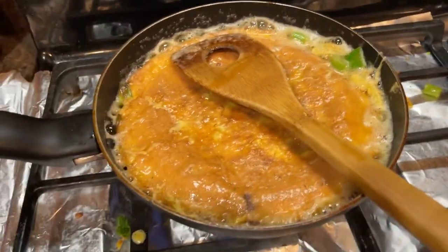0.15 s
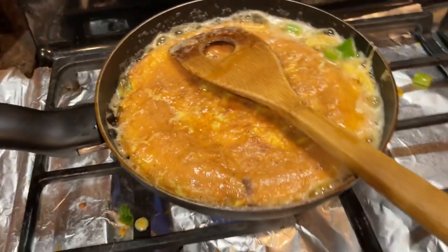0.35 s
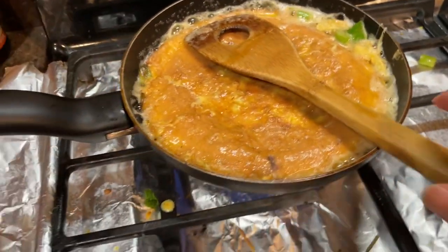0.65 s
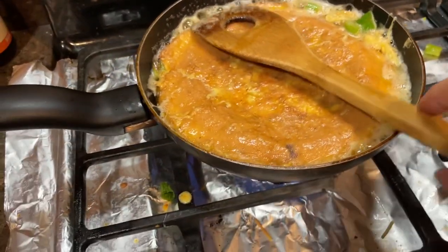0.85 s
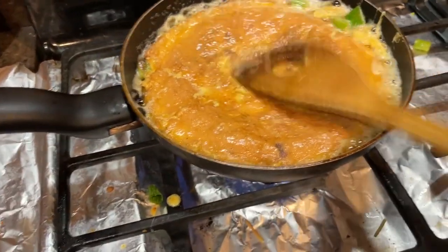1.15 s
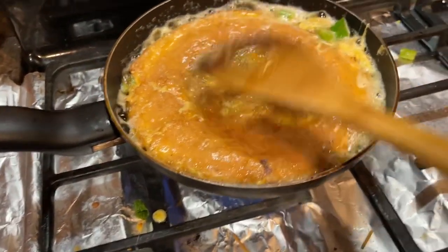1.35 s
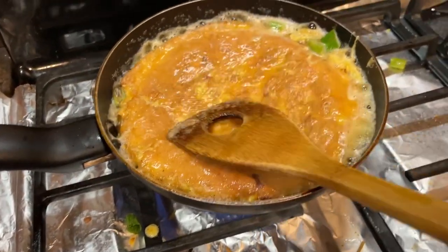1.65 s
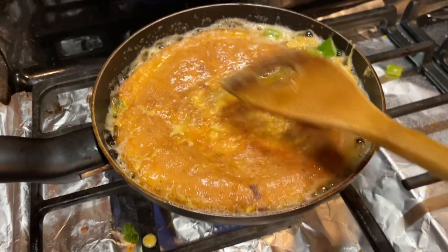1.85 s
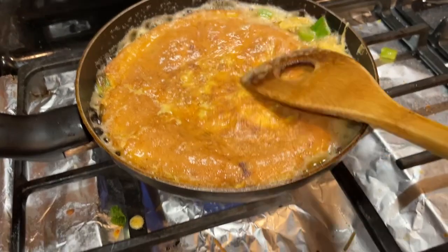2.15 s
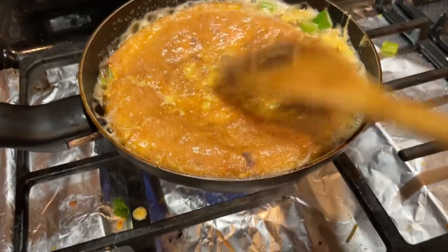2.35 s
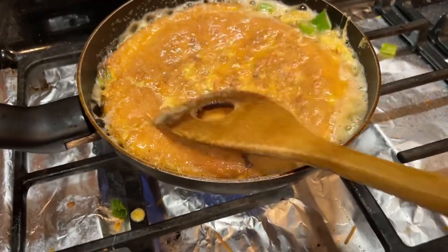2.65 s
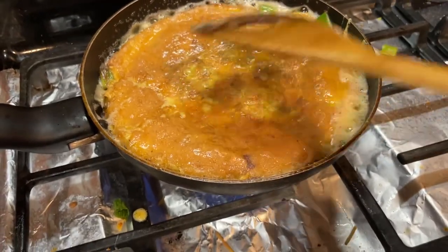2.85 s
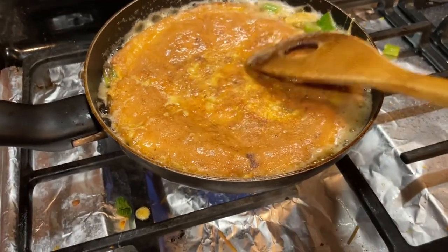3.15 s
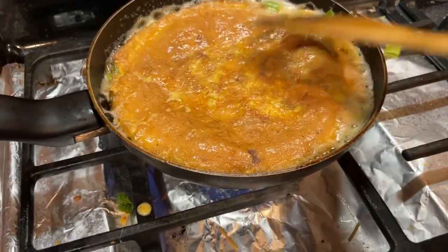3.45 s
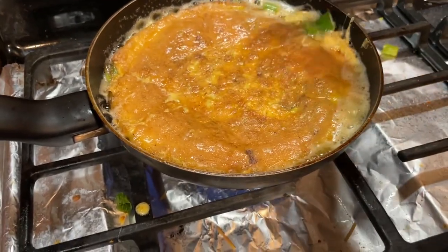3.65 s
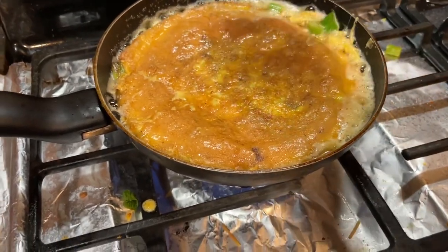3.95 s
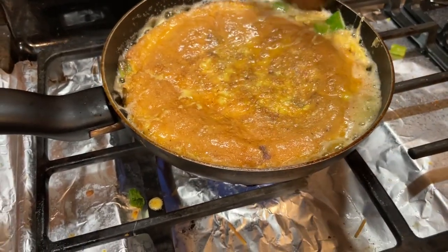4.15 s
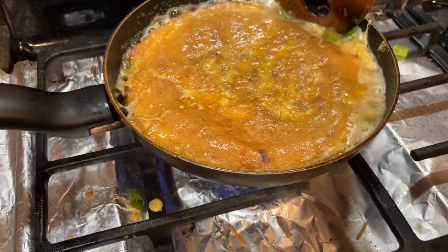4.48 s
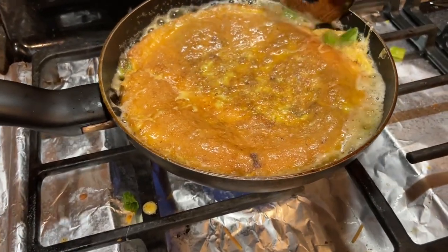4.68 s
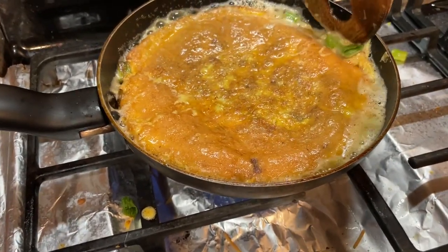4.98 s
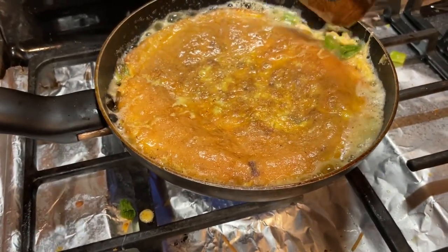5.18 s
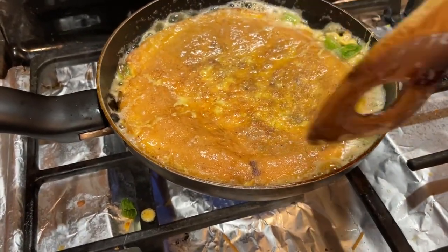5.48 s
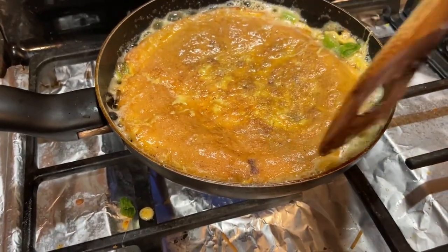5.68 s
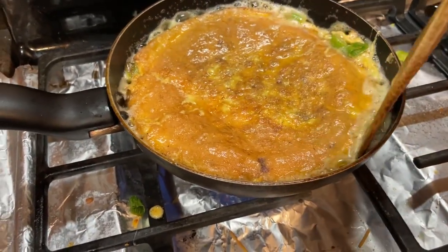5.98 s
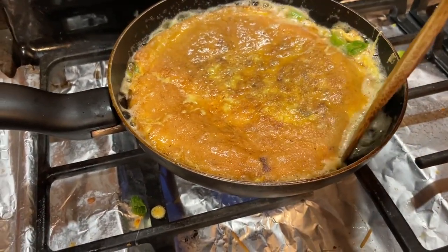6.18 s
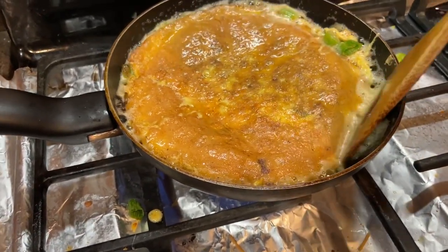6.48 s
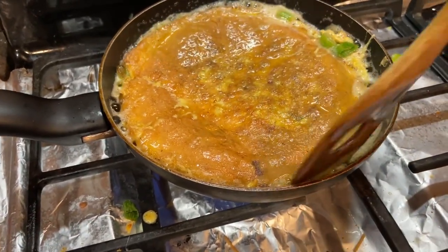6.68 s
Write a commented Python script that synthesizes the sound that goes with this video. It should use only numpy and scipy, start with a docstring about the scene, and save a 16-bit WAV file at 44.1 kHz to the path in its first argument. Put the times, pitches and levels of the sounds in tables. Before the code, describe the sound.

Close to a pan on a gas stove, egg batter fries with a dense, bright fizz and irregular popping spits. A wooden spoon cracks sharply on the pan early, with faint taps after. Later a heavier knock rocks the pan on its iron grate. Near the end the spoon scrapes the wall and knocks twice as the sizzle swells. Low kitchen hum and rumble lie beneath.

```python
"""An egg pancake fries in oil on a gas stove, close to a phone: throughout, crackling noise makes dense fizz
and short rings with snaps make spits of steam; a motor (wavering sine) hums over rumble (shaped noise).
At 1.15 s a wooden spoon knocks the pan (damped modes, chattering noise); light knocks follow. At 4.55 s
another rocks the pan on its iron grate (low sine pulses). From 6.0 s the spoon scrapes the wall (clicks
and grit through resonances); two knocks come at 6.49 and 6.72 s as the fizz swells to the end."""
import sys
import numpy as np
from scipy import signal
from scipy.fft import rfft, irfft, next_fast_len
from scipy.io import wavfile
from scipy.ndimage import uniform_filter1d

SR = 44100
rng = np.random.default_rng(int(sys.argv[2]) if len(sys.argv) > 2 else 0)


def store_wav(level_fs):
    """Save 16-bit WAV to argv[1]."""
    pcm = np.round(np.clip(np.atleast_2d(level_fs), -1, 1) * 32767)
    wavfile.write(sys.argv[1], SR, pcm.T.astype(np.int16))


N = 301057


def undb(db):
    """Decibels to gain."""
    return 10 ** (np.asarray(db) / 20)


def level(x, db):
    """Scale to an rms level."""
    return x * undb(db) / np.sqrt(np.mean(x ** 2))


def curve(rows, rest_db=-90):
    """A level table as gain per sample, rest_db outside it."""
    s, db = np.transpose(rows)
    return undb(np.interp(np.arange(N) / SR, s, db, rest_db, rest_db))


def colour(x, points, lag_s=0.):
    """Shape by (frequency [Hz], gain [dB]) points and delay by lag_s."""
    size = next_fast_len(N + 4096)
    hz = np.maximum(np.arange(size // 2 + 1) * SR / size, 1)
    f, db = np.transpose(points)
    gain = undb(np.interp(np.log(hz), np.log(f), db))
    delay = np.exp(-2j * np.pi * hz * lag_s)
    return irfft(rfft(x, size) * gain * delay, size)[..., :N]


def band(x, hz, width_hz):
    """Resonance with gain 1 at its centre."""
    b, a = signal.iirpeak(hz, hz / width_hz, fs=SR)
    return signal.lfilter(b, a, x)


def walk(rate_hz):
    """Random levels held 1 / rate_hz s and smoothed twice; spread near 1."""
    k = int(SR / rate_hz)
    steps = np.repeat(rng.standard_normal(N // k + 1), k)
    return 1.3 * uniform_filter1d(uniform_filter1d(steps, k), k)[:N]


def add(out, s, piece):
    """Mix a short sound in at time s."""
    i = int(round(s * SR))
    out[i:i + len(piece)] += piece[:N - i]


def crackle(per_s, spread_db, tail_s):
    """Random bursts, a few much larger than most, each with a short rustling tail; rms 1."""
    hits = rng.random(N) < per_s / SR
    sizes = hits * undb(spread_db * np.minimum(rng.exponential(size=N), 5))
    keep = np.exp(-1 / (tail_s * SR))
    power = signal.lfilter([1], [1, -keep], sizes ** 2)
    return level(np.sqrt(power) * rng.standard_normal(N), 0)


PORT_LAG_S = 4.4e-5


def ports(x):
    """A source near the phone reaches the left port first, the right PORT_LAG_S later."""
    flat = [(1, 0), (2, 0)]
    return np.array([x, colour(x, flat, PORT_LAG_S)])


# side channel under mid: (frequency [Hz], gain [dB])
SIDE_GAIN = [(60, -42), (200, -25), (380, -10.5), (700, -3.5), (1300, -3.5)]


def widen(mid, side):
    """Left and right from mid plus and minus the shaped side."""
    return mid + colour(side, SIDE_GAIN) * np.array([[1], [-1]])


# oil activity: (time [s], level [dB])
FIZZ_LEVEL = [(0.0, -51), (0.18, -52), (0.83, -54), (2.0, -51.5), (2.81, -52.5), (2.96, -50.5),
              (3.35, -50.5), (3.66, -53.5), (4.15, -52), (4.4, -52), (4.78, -52), (5.3, -51), (5.91, -53.5),
              (6.83, -47.5)]
# fizz spectrum: (frequency [Hz], gain [dB])
FIZZ_COLOUR = [(500, -8), (1000, -1), (2000, -2), (3000, -4), (4000, -1), (6000, 0), (8500, 0), (10500, -2),
               (11300, -6), (13000, -11), (14500, -9), (15300, -4), (15720, -5), (15850, -24)]


def fizz():
    """Countless tiny bubbles, sparser large ones, and the part scattered by the hob."""
    tiny = crackle(2500, 2.64, 0.00081) * undb(2.0 * walk(8.1) + 1.22 * walk(30))
    large = undb(-10.0) * crackle(140, 7.3, 0.003)
    scattered = np.array([crackle(3300, 2.6, 0.0016) for _ in range(2)]) * undb(1.0 * walk(15))
    # short waves come straight, long ones from all round
    tilt = [(1000, 3.5), (5000, 1.0), (9000, -10), (16000, -100)]
    bubbles = ports(tiny + large) + undb(1.5) * colour(scattered, tilt)
    return curve(FIZZ_LEVEL) * level(colour(bubbles, FIZZ_COLOUR), 0)


# spits at set times, most of them loud; levels before colouring:
# (time [s], bubble level [dB], bubble pitch [Hz], treble snap level [dB])
SET_SPITS = [(0.014, -44, 4500, -35), (0.126, -42, 5500, -39), (0.183, -47, 4500, -40),
             (0.408, -40, 4000, -48), (0.614, -46, 4500, -47), (0.1946, -39.5, 5130, -47),
             (0.284, -45, 6760, -30.5), (0.545, -38, 5530, -26.5), (0.7173, -58, 1600, -30),
             (1.0475, -42, 4800, -28), (1.3742, -42, 4790, -29), (1.4287, -54, 6460, -29.5),
             (1.5591, -53, 3260, -30), (1.69, -38, 1840, -56), (2.126, -36, 1730, -32),
             (2.1407, -27.5, 4830, -27), (2.2261, -42.5, 4740, -29), (2.7529, -56, 6500, -28),
             (2.8168, -52, 1290, -27), (2.885, -40.5, 5000, -35), (2.9451, -42, 6800, -28.5),
             (3.0066, -34, 6640, -25), (3.1002, -58, 5360, -29), (3.2142, -33.5, 4800, -33),
             (3.2429, -34, 5370, -23), (3.39, -47, 5500, -30), (3.6, -42, 3500, -50),
             (3.7175, -39.5, 6980, -26), (3.903, -55, 4650, -27), (4.2237, -50, 6050, -30.5),
             (4.231, -49, 5800, -45), (4.335, -42, 5000, -36), (4.3399, -45, 4760, -27),
             (4.354, -43, 3500, -53), (4.399, -40, 5500, -33), (4.422, -39, 4500, -45),
             (4.4268, -39, 4480, -43), (4.498, -49, 5000, -29), (4.623, -29.5, 6700, -47),
             (4.6822, -40, 5470, -27), (4.898, -42, 4500, -44), (4.916, -38.5, 5000, -48),
             (5.077, -41, 4520, -34), (5.135, -49, 5500, -34), (5.176, -48, 5000, -36),
             (5.44, -51, 4500, -38), (5.488, -58, 6000, -33), (5.2055, -45, 5680, -30),
             (5.5886, -61, 5640, -26), (6.0164, -41, 4900, -22), (6.2209, -36, 4640, -31),
             (6.2879, -36, 6230, -20.5), (6.5763, -30.5, 5020, -40), (6.5967, -27.5, 7000, -17.5),
             (6.618, -37.5, 4000, -44)]
# air in the pan's bowl: (frequency [Hz], width [Hz], gain [dB])
BOWL_AIR = [(2290, 590, -8), (3800, 560, -4), (4650, 160, -16), (5750, 630, 0)]


def spits():
    """Each spit: a bubble that rings a few cycles, a bright snap, a spray of droplets."""
    bubbles, snaps, t = np.zeros(N), np.zeros(N), np.arange(1500) / SR
    rows = [*SET_SPITS, *small_spits()]
    chance = rng.standard_normal((len(rows), 2, len(t)))
    burst = np.exp(-t / 0.0004) + 0.26 * np.exp(-t / 0.006)
    for (s, db, hz, snap_db), (splash, spray) in zip(rows, chance):
        ring = np.exp(-t * hz / 1.7) * np.sin(2 * np.pi * hz * t)
        add(bubbles, s, undb(db) * (ring + 1.21 * splash * burst))
        add(snaps, s, undb(snap_db) * spray * burst)
    low = colour(bubbles, [(700, -62), (1500, -0.5), (6500, 3.5), (9000, -20)])
    low = low + sum(undb(db) * band(low, hz, width_hz) for hz, width_hz, db in BOWL_AIR)
    snap_colour = [(4000, -25), (7000, 3.5), (10500, -4.5), (13000, -8.0), (15700, -3.0), (16300, -28)]
    return ports(low + colour(snaps, snap_colour))


SMALL_SPITS_PER_S = 45
SMALL_BUBBLE_TOP_DB, SMALL_BUBBLE_SPREAD_DB = -46, 4
SMALL_PITCH_HZ, SMALL_PITCH_SPREAD_OCT = 4900, 0.28
SMALL_SNAP_TOP_DB, SMALL_SNAP_SPREAD_DB = -41.5, 17.5


def small_spits():
    """Rows like those of the set spits, drawn by chance: bubbles and snaps fall below their top levels."""
    count = int(SMALL_SPITS_PER_S * N / SR)
    bubble, pitch, snap = rng.standard_normal((count, 3)).T
    times_s = rng.random(count) * N / SR
    bubble_db = SMALL_BUBBLE_TOP_DB - SMALL_BUBBLE_SPREAD_DB * abs(bubble)
    pitch_hz = SMALL_PITCH_HZ * 2 ** (SMALL_PITCH_SPREAD_OCT * pitch)
    snap_db = SMALL_SNAP_TOP_DB - SMALL_SNAP_SPREAD_DB * abs(snap)
    return list(zip(times_s, bubble_db, pitch_hz, snap_db))


# modes of pan and grate: (frequency [Hz], relative level [dB], free t60 [s])
PAN_MODES = [(77, 9, 0.2), (118.7, -7, 0.44), (160.5, 5.5, 0.16), (227, -9.5, 0.17), (269.3, -1.5, 0.22),
             (329.4, -6.5, 0.3), (368, -3, 0.21), (425.5, -14, 0.43), (489, -4, 0.073), (583, -5, 0.039),
             (674, -7.5, 0.1), (777, -18.5, 0.33), (897, -12, 0.1), (1059, -12, 0.2), (1120, -8, 0.092),
             (1220, -17, 0.18), (1476, -7, 0.043), (1580, -16.5, 0.074), (1525, -13, 0.03),
             (1667, -10.5, 0.12), (2065, -5, 0.043), (2250, -11.5, 0.08), (2327, -9, 0.06),
             (2750, -24, 0.08), (2980, -26, 0.12), (3674, 2, 0.049), (5060, -16, .025), (5880, -0.5, 0.035),
             (6500, 1, 0.026)]
# ringing parts of the knocks, several to a knock: (time [s], level [dB],
# pitch of the modes driven most [Hz], spread [octaves], multiple of the free t60 [1])
KNOCK_PARTS = [(1.1542, -14, 3100, 1.45, 0.31), (1.158, -18.5, 710, 0.3, 1.7),
               (1.159, -24.5, 243, 0.37, 1.5), (1.174, -26, 650, 0.61, 1.7), (1.166, -26, 500, 0.15, 2.1),
               (1.17, -25, 1040, 0.1, 0.8), (1.185, -25, 95, 0.52, 0.74), (1.161, -43, 1200, 0.17, 1.5),
               (1.197, -33.5, 900, 0.33, 1.5), (1.218, -27, 560, 0.85, 0.44), (1.221, -35, 1100, 0.25, 0.8),
               (1.237, -35, 1060, 0.2, 0.7), (1.24, -36, 530, 0.27, 0.9), (1.392, -34.5, 396, 1.9, 0.27),
               (2.362, -27, 1400, 0.15, 0.27), (4.211, -32, 1550, 0.29, 0.27),
               (4.554, -28.5, 905, 1.2, 1.2), (4.552, -19, 195, 0.78, 1.6), (4.564, -14.5, 200, 0.55, 0.78),
               (4.5718, -15.5, 106, 1.1, 0.83), (4.56, -25, 2600, 0.23, 0.75),
               (4.592, -25.5, 2800, 0.15, 1), (4.59, -33, 400, 0.76, 0.82), (4.626, -24.5, 200, 0.54, 0.88),
               (4.642, -18.5, 156, 0.36, 0.7), (4.576, -29, 2000, 0.4, 0.8), (4.612, -31, 1800, 0.4, 0.8),
               (4.634, -36, 1900, 0.45, 0.8), (4.681, -29.5, 160, 0.75, 0.81),
               (5.572, -39.5, 440, 0.39, 1.8), (5.834, -42, 427, 0.24, 4.5), (6.487, -31, 706, 1, 0.72),
               (6.488, -20, 620, 0.15, 1.2), (6.496, -25.5, 1350, 0.72, 0.91),
               (6.4965, -18, 370, 0.24, 0.64), (6.524, -24.5, 160, 0.53, 0.83),
               (6.505, -27, 260, 0.18, 0.8), (6.541, -29, 350, 0.43, 0.53), (6.521, -32, 1400, 0.46, .9),
               (6.545, -35, 2000, 0.34, 1.2), (6.562, -38, 1600, .4, 1), (6.502, -24.5, 122, 0.53, 1.2),
               (6.723, -29, 900, 0.37, .55), (6.723, -19.5, 585, 0.1, 1.35), (6.735, -14, 2400, 0.14, .6),
               (6.733, -23, 2000, 0.3, 0.8), (6.739, -18, 340, 0.25, 0.47), (6.738, -24, 620, 0.14, 1.1),
               (6.792, -28, 530, 0.47, 0.92), (6.751, -12.5, 92, 0.55, 0.7), (6.806, -26.5, 91, 1.1, 0.55)]
CONTACT_S, CONTACT_HZ, CONTACT_LAW = 0.002, 400, 0.37  # push time at CONTACT_HZ; duller parts rise slower


def knocks():
    """Each part of a knock rings the modes near its pitch, each mode with its own decay."""
    ring, t = np.zeros(N), np.arange(SR // 2) / SR
    hz, mode_db, t60_s = np.transpose(PAN_MODES)[:, :, None]
    # neighbouring modes push the air in opposite senses
    signs = -(-1.) ** np.arange(len(PAN_MODES))[:, None]
    waves = signs * undb(mode_db) * np.sin(2 * np.pi * hz * t)
    for s, db, centre_hz, spread_oct, free in KNOCK_PARTS:
        share = np.exp(-.5 * (np.log2(hz / centre_hz) / spread_oct) ** 2)
        contact_s = CONTACT_S * (CONTACT_HZ / centre_hz) ** CONTACT_LAW
        push = 1 - np.exp(-t / contact_s)
        decay = undb(-60 * t / (free * t60_s))
        add(ring, s, undb(db) * (share * decay * waves).sum(axis=0) * push)
    return ports(ring)


# jolts: (time [s], rattle level [dB], hiss level [dB], crack level [dB], multiple of the free t60 [1])
PAN_JOLTS = [(1.153, -29, -34.5, -13, 0.51), (1.172, -41, -71, -42, 2), (1.215, -49, -65, -70, 0.38),
             (4.549, -38, -37, -64, 0.81), (4.557, -30, -38, -62, 0.77), (4.569, -41, -57, -65, 0.73),
             (4.593, -40, -52, -67, 0.39), (4.632, -59, -59, -65, 0.41), (4.66, -50.5, -58, -67, 2.2),
             (6.485, -28.5, -42, -60, 0.68), (6.5, -45, -48.5, -65, 3), (6.722, -25, -36, -62, 0.55),
             (6.737, -29.5, -47, -67, 0.41), (6.804, -42, -64, -67, 0.57)]
# grate chatter, before the pan modes: (frequency [Hz], gain [dB])
RATTLE_COLOUR = [(60, -14), (120, 0), (400, 10), (1200, -3.5), (2500, -16.5), (4000, -61)]
# bright part of the chatter: (frequency [Hz], gain [dB])
HISS_COLOUR = [(1000, -9.5), (2000, -5.5), (3300, -8), (4500, -12), (8000, -24.5), (10000, -73)]
# wood meeting steel: (frequency [Hz], gain [dB])
CRACK_COLOUR = [(800, 0), (1600, 9.5), (4000, 5.5), (7000, 3), (9500, -1), (11000, -63)]
CLATTER_T60_S, HISS_T60_S, CRACK_T60_S = 0.36, 0.42, 0.03  # free decay
JOLT_RISE_S, CRACK_RISE_S = 0.0013, 0.001


def chatter():
    """Each jolt sets the pan chattering on the grate as decaying noise; the knock at 1.15 s also cracks."""
    rattle, hiss, crack = np.zeros((3, N))
    t = np.arange(SR // 2) / SR
    build = 1 - np.exp(-t / JOLT_RISE_S)
    crack_build = 1 - np.exp(-t / CRACK_RISE_S)
    for s, rattle_db, hiss_db, crack_db, free in PAN_JOLTS:
        fall_db = -60 * t / free
        add(rattle, s, undb(rattle_db + fall_db / CLATTER_T60_S) * build)
        add(hiss, s, undb(hiss_db + fall_db / HISS_T60_S) * build)
        add(crack, s, undb(crack_db + fall_db / CRACK_T60_S) * crack_build)
    shake = 0
    layers = ((rattle, RATTLE_COLOUR, 900), (hiss, HISS_COLOUR, 500), (crack, CRACK_COLOUR, 20000))
    for envelope, points, per_s in layers:
        noise = colour([crackle(per_s, 1.8, 0.0057) for _ in range(2)], points)
        if envelope is rattle:  # sounds through the pan's own modes
            noise = 0.2 * noise + sum(band(noise, hz, 20.0 / t60_s) for hz, _, t60_s in PAN_MODES)
        mid, side = level(noise, 0)
        shake = shake + envelope * widen(mid, 0.9 * side)
    return shake


# pan's lowest mode, pumped: (time [s], peak level [dB], frequency [Hz], length [s])
PAN_ROCKS = [(4.689, -20, 76, 0.056), (4.759, -26, 78.5, 0.075), (4.84, -25, 76.3, 0.049)]


def rocking():
    """Each rock on the grate swells and is choked as the pan seats again."""
    out = np.zeros(N)
    for s, db, hz, length_s in PAN_ROCKS:
        t = np.arange(int(length_s * SR)) / SR
        swell = np.sin(np.pi * t / length_s) ** 0.65
        add(out, s, undb(db) * swell * np.sin(2 * np.pi * hz * t))
    return out


# grit under the spoon's edge: (time [s], level [dB])
SCRAPE_LEVEL = [(6.05, -62), (6.164, -57), (6.3, -46), (6.354, -43), (6.42, -39.5), (6.478, -45),
                (6.5, -62)]
# catches and slips of the edge: (time [s], peak level [dB], brightness [dB per octave])
SLIPS = [(6.016, -21.5, 2), (6.1, -24.5, 1), (6.14, -34, -5), (6.163, -32, 0), (6.1709, -30, -7),
         (6.2043, -24, 1), (6.2208, -30, -9), (6.2242, -28, 3), (6.2384, -32, -7), (6.2484, -33, -2),
         (6.274, -23.5, 0), (6.287, -37, 0), (6.291, -29, 1), (6.3143, -27, -11), (6.299, -36, 0),
         (6.33, -25.5, 6), (6.3487, -23.5, -1), (6.356, -25.5, -5), (6.376, -21, -4), (6.383, -23.5, 0),
         (6.3935, -21.5, -1), (6.3984, -25, -3), (6.414, -25, -1), (6.4185, -37, 4), (6.425, -28, 3),
         (6.442, -28, -3), (6.4484, -29, -4), (6.4748, -31, -8)]
RASP_S, TAIL_S, RASP_GAIN, TAIL_GAIN = 0.00048, 0.0055, 0.19, 0.12


def scrape():
    """Fine grit and separate slips, each a dry click with a short rasp, sound through the pan wall."""
    grit = wall(crackle(1300, 3.2, 0.0008) * undb(1.5 * walk(60)))
    out = curve(SCRAPE_LEVEL) * level(grit, 0)
    t = np.arange(1200) / SR
    rasp = RASP_GAIN * np.exp(-t / RASP_S) + TAIL_GAIN * np.exp(-t / TAIL_S)
    for (s, db, slope_db), noise in zip(SLIPS, rng.standard_normal((len(SLIPS), len(t)))):
        click = t == 0
        tick = wall(click + rasp * noise, slope_db)
        add(out, s, undb(db) * tick / np.abs(tick).max())
    return ports(out)


# pan wall resonances: (frequency [Hz], width [Hz], gain before tilt [dB])
WALL_MODES = [(1750, 400, -11), (2300, 450, -7), (3100, 1200, -10), (3880, 260, 3), (4600, 450, 2),
              (4200, 5000, -11), (6000, 1500, -4), (8500, 4000, -8)]


def wall(x, slope_db=0.):
    """The broad resonances of the pan wall, tilted about 4 kHz by dB per octave."""
    return sum(undb(db + slope_db * np.log2(hz / 4000)) * band(x, hz, width_hz)
               for hz, width_hz, db in WALL_MODES)


# motor hum: (mean frequency [Hz], rms level before wavering [dB])
MOTOR_HUM = (59.3, -43)
# rumble spectrum: (frequency [Hz], gain [dB])
RUMBLE_COLOUR = [(30, -10.5), (48, -3.5), (62, -7), (78, 1.5), (100, -1.5), (128, 3.5), (190, -6.5),
                 (245, 0), (310, -9.5), (360, -8), (430, -20.5), (520, -27), (600, -25), (900, -25.5),
                 (1500, -47.5), (2500, -84)]
RUMBLE_DB = -41.5  # before widening and wavering
# narrow airy bands: (frequency [Hz], width [Hz], level [dB], left minus right [dB])
AIRY_BANDS = [(610, 105, -66, -6.5), (729, 45, -61, -6.5), (1052, 9.3, -77.5, 10), (1244, 18, -82.5, -22),
              (1790, 88, -70.5, -10), (2228, 39, -69, -1), (2394, 240, -69, 3)]


def kitchen():
    """A wavering motor hum, rumble nearly the same on both sides, and narrow airy bands."""
    hz, db = MOTOR_HUM
    waver_db = 1.1 * walk(3)
    phase = 2 * np.pi * np.cumsum(hz + .5 * walk(2.076)) / SR
    hum = np.sqrt(2) * undb(db + waver_db) * np.sin(phase)
    mid, side = level(colour(rng.standard_normal((2, N)), RUMBLE_COLOUR), RUMBLE_DB)
    out = hum + undb(0.87 * walk(5.4)) * widen(mid, side)
    for hz, width_hz, db, pan_db in AIRY_BANDS:
        narrow = band(rng.standard_normal(N), hz, width_hz)
        air = level(band(narrow, hz, 2 * width_hz), db)
        out = out + air * undb([[pan_db / 2], [-pan_db / 2]])
    return out


def scene():
    """Everything at the two ports."""
    return fizz() + spits() + knocks() + chatter() + rocking() + scrape() + kitchen()


TOP_HZ, BASS_HZ = 16400, 34


def record(dry):
    """The right port is keener in the low middle; the phone cuts the deep bass and the top."""
    keener = [(60, 0.12), (200, 1.1), (400, 1.0), (650, 3.7), (900, 0.9), (1500, 0.76), (4000, 0.16)]
    left, right = dry[0], colour(dry[1], keener)
    bass_cut = signal.butter(2, BASS_HZ, "high", fs=SR, output="sos")
    top_cut = signal.ellip(8, .2, 70, TOP_HZ, fs=SR, output="sos")
    return signal.sosfilt(top_cut, signal.sosfilt(bass_cut, [left, right]))


dry = scene()
out = record(dry)
store_wav(out)
```